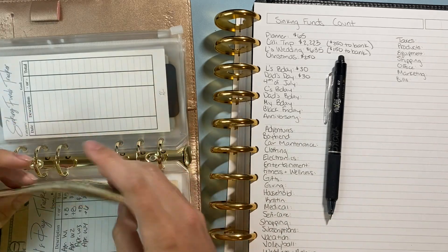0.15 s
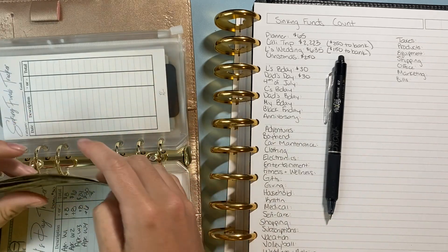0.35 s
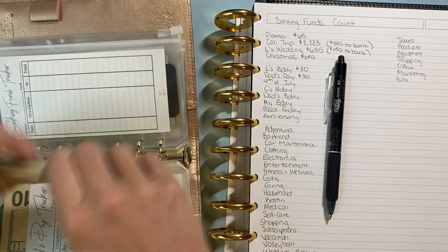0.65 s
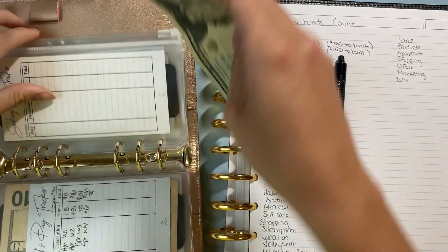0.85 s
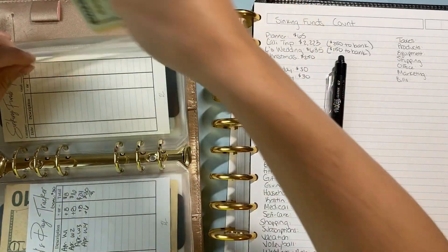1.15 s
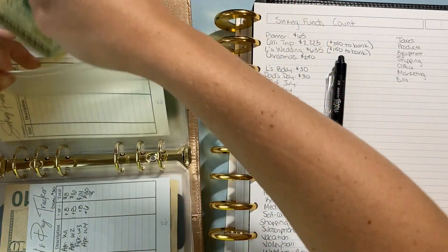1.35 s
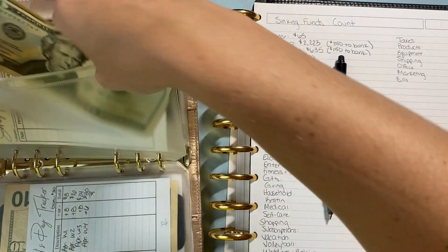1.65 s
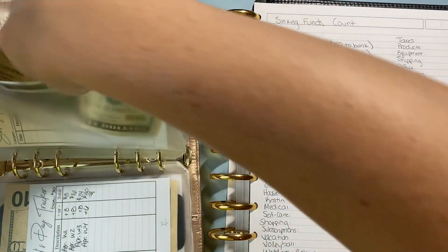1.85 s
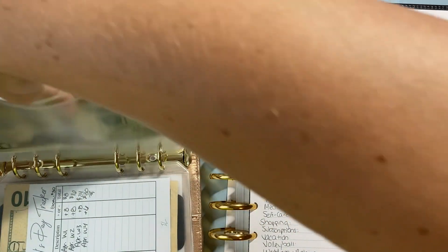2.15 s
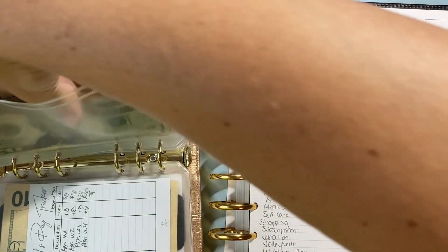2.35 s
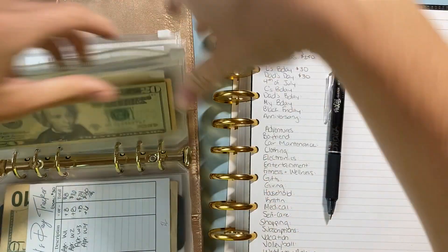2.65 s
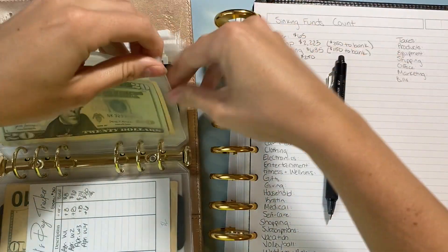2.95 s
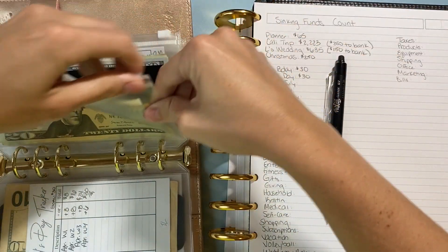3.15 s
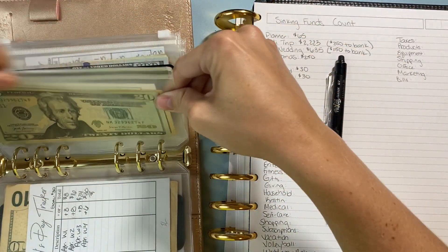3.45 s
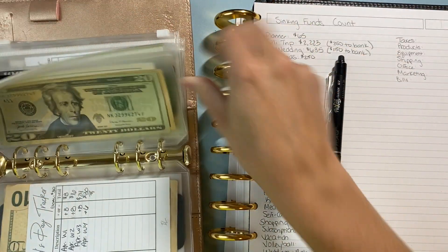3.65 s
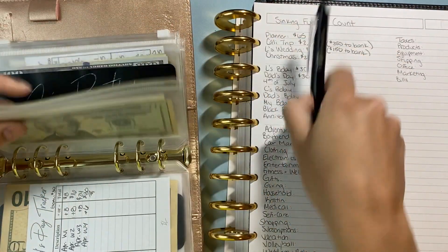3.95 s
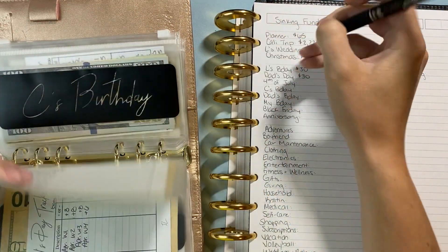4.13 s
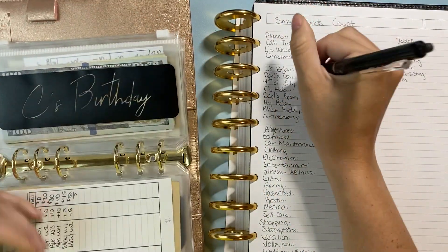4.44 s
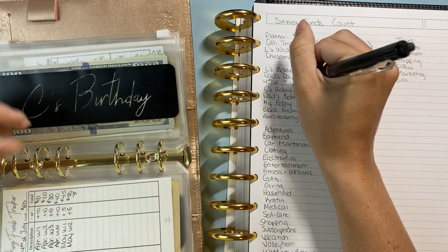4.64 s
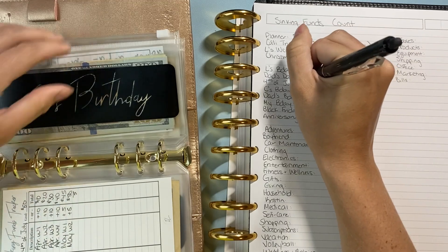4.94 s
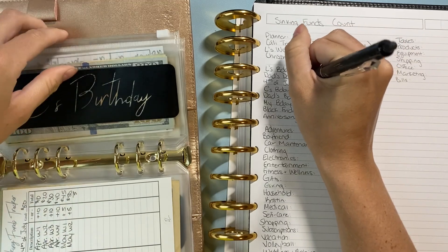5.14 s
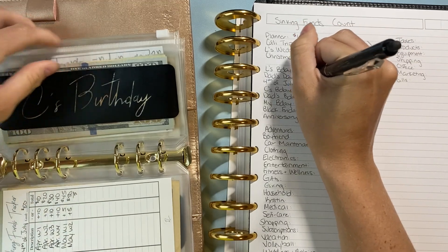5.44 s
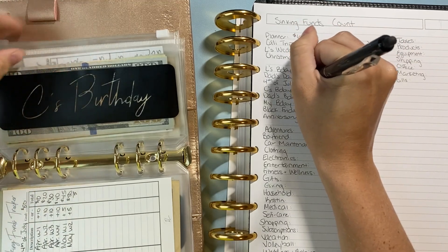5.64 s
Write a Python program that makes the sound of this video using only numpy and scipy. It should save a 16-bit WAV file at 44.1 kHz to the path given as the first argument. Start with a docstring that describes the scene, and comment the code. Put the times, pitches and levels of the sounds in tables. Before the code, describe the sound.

A low, slightly wavering ventilation rumble with very faint hiss runs throughout a small room; the microphones are close, in stereo. At 0.0 s bright, strong vinyl snaps and a rustle burst out, then softer brushing and duller flicks around 0.4-0.7 s as banknotes are pulled free. From 0.85 to 1.4 s there are light slides and thin, gliding rubs. Between 1.45 and 2.5 s rustling is densest as notes are pushed into the next envelope, with crackles, soft low binder bumps and a loud crack at 1.92 s. Quick strokes and small snaps follow at 2.8-3.1 s, a smooth slider rub until 3.35 s, then flicks at 3.45-3.7 s as the envelope turns. From 3.85 to 4.4 s plastic pen clicks mix with hollow notepad knocks; a strong page snap lands at 4.4 s, with a small rustle at 4.55 s. Afterwards only faint ticks remain, plus one soft flick at 5.5 s.

```python
"""Over steady ventilation rumble, banknotes are pulled from one vinyl envelope of a ring binder,
pushed into the next, and its slider is drawn shut; it is turned over, a pen is taken up with hollow
knocks on a notepad, a page is turned and fingers settle. Strokes are shaped noise and crinkles, snaps
and knocks are bursts rung by panels, rubs are gliding noise bands, the pen clicks through its barrel,
and bumps ring the binder's decaying modes. A small room answers the hands."""
import sys
import numpy as np
from scipy import signal
from scipy.fft import rfft, irfft, next_fast_len
from scipy.io import wavfile
from scipy.ndimage import uniform_filter1d, map_coordinates

SR = 44100
rng = np.random.default_rng(int(sys.argv[2]) if len(sys.argv) > 2 else 0)


def transcribe(u):
    """Save the signal u as a 16-bit wav file named by the first command-line argument.

    u: samples, shape (n,) or (channels, n), limited to [-1, 1]; the rate is SR.
    q: integer samples, one column per channel.
    """
    v = np.clip(np.atleast_2d(u).T, -1, 1)
    q = np.round(v * 32767).astype(np.int16)
    wavfile.write(sys.argv[1], SR, q)


N = 255339
TOP_HZ = 15950  # band limit


def amp(db):
    """Decibels to gain."""
    return 10 ** (np.asarray(db) / 20)


def unit(x):
    """x at rms 1."""
    return x / np.sqrt(np.mean(x ** 2) + 1e-20)


def along(points, hz):
    """(frequency, value) points interpolated on a log frequency axis."""
    f, v = np.transpose(points)
    return np.interp(np.log(hz + 1), np.log(f + 1), v)


def filtered(x, response):
    """x times a response of frequency."""
    size = next_fast_len(x.shape[-1] + SR // 4)
    spectrum = rfft(x, size) * response(np.fft.rfftfreq(size, 1 / SR))
    return irfft(spectrum, size)[..., :x.shape[-1]]


def add(track, time_s, sound):
    """Mix a sound into a track from time_s on."""
    start = max(0, round(time_s * SR))
    part = track[..., start:start + sound.shape[-1]]
    part += sound[..., :part.shape[-1]]


def wobble(rate_hz):
    """A smooth random curve of rms 1, rate_hz knots a second."""
    knots = rng.standard_normal(int(N * rate_hz / SR) + 4)
    return unit(map_coordinates(knots, [np.arange(N) * rate_hz / SR], order=2))


# left-right likeness at the microphones: (frequency [Hz], likeness [0-1])
LIKENESS = [(60, 1), (150, 0.93), (400, 0.59), (1300, 0.54), (3000, 0.54), (4500, 0.51), (5600, 0.055),
            (6800, 0.98), (15000, 0.84)]


def ports(pair):
    """Two unrelated signals become left and right, as alike as each frequency is at the microphones."""
    most_alike = .9  # above SR / 20

    def mid_side_gains(hz):
        limit = np.where(hz > SR / 20, most_alike, 1)
        turn = np.arccos(np.clip(along(LIKENESS, hz), 0, limit)) / 2
        return np.array([np.cos(turn), np.sin(turn)])

    mid, side = filtered(pair, mid_side_gains)
    return np.array([mid + side, mid - side])


def coloured(pair, spectrum):
    """A stereo signal of rms 1 with the given spectrum."""
    return unit(ports(filtered(pair, lambda hz: amp(along(spectrum, hz)))))


# ventilation spectrum: (frequency [Hz], level [dB])
AIR_SPECTRUM = [(15, -40), (30, -16.5), (40, -7), (54, 3), (70, 0.5), (95, -3.5), (120, 0.5), (150, -15.5),
                (200, -22.5), (280, -20), (450, -30), (1200, -47.5), (4000, -57.5), (11000, -54.5),
                (16000, -61)]


def ventilation():
    """Shaped noise: a low rumble that wavers a little, with faint hiss."""
    air = coloured(rng.standard_normal((2, N)), AIR_SPECTRUM)
    rumble = filtered(air, lambda hz: 1 / (1 + (hz / 170) ** 4))
    waver = amp(1.6 * wobble(8.7))
    return amp(-44) * (air + rumble * (waver - 1))


# hand slides paper or vinyl:
# (start [s], rise [s], fall [s], rustle [dB], hiss over rustle [dB], body over rustle [dB])
STROKES = [ (.012, 0.0063, 0.057, -37, 1.5, -11), (.265, 0.032, 0.011, -52.5, 2.5, -14),
           (.41, 0.029, 0.034, -44, -2.5, -6.5), (.465, 0.021, 0.14, -46, 0, -1),
           (.55, 0.059, 0.044, -46, -9, -8), (.61, 0.042, 0.086, -49.5, 3.5, -1),
           (.867, .012, 0.02, -53, 2.5, 0), (.945, 0.039, 0.048, -50, 3.5, -27),
           (1.208, 0.048, 0.067, -54, 7.5, -14), (1.44, 0.011, 0.021, -43.5, -9, -4.5),
           (1.55, 0.053, 0.026, -43.5, 2, -21), (1.615, 0.043, 0.053, -37, -3.5, -7.5),
           (1.755, .045, .05, -39.5, -0.5, -10), (1.878, 0.022, 0.092, -36, -4, -15),
           (1.94, 0.038, 0.068, -40.5, -6, -2.5), (1.999, 0.12, 0.045, -39, 3, -30),
           (2.18, 0.027, .025, -45, -3.5, 6), (2.24, 0.019, 0.097, -41.5, -6.5, -4.5),
           (2.365, 0.023, 0.2, -50.5, -5.5, -9), (2.46, 0.027, 0.043, -39, -2.5, 0.5),
           (2.61, 0.081, 0.026, -51, -1, -31), (2.778, 0.023, 0.044, -44.5, -9.5, -1.5),
           (2.862, 0.02, 0.033, -37.5, -7, -13), (2.90, 0.049, 0.047, -51.5, -2.5, 4),
           (3.07, 0.011, 0.026, -58.5, 2.5, 1), (3.191, 0.098, 0.05, -47, 1.5, -14),
           (3.37, 0.088, 0.18, -50.5, 0, -6.5), (3.555, .017, 0.011, -37.5, 1.5, -2),
           (3.684, 0.034, .04, -45, 1.5, -6), (3.825, 0.046, 0.081, -48.5, 9.5, 0.5),
           (4.01, 0.027, 0.028, -48, 5, -15), (4.06, 0.12, 0.064, -46.5, 4.5, 0.5),
           (4.285, 0.08, 0.048, -47.5, 4, -5), (4.39, 0.015, 0.056, -46.5, 3, -2),
           (4.533, 0.023, 0.035, -54, 8.5, -2), (5.474, .023, 0.042, -50, -4.5, 0.5)]
# light contact between strokes, firmest while the notes go in: (time [s], rustle level [dB])
LIGHT_CONTACT = [(0, -59.5), (.7, -66.5), (.84, -74), (.95, -64.5), (1.15, -70.5), (1.35, -64),
                 (1.6, -49.5), (2.15, -54), (2.6, -63), (2.74, -68), (2.9, -63), (3.02, -66), (3.16, -59.5),
                 (3.65, -66), (4.45, -63), (4.68, -79.5), (5.79, -75)]


def effort():
    """Gains of rustle, hiss and body: each stroke swells and dies away on top of the light contact."""
    contact_hiss_db, contact_body_db = 0, -3  # over its rustle
    edge_drop_db, roundness = 14.5, 1.32  # drop from peak after one rise or fall; power of the slope
    t = np.arange(N) / SR
    contact_offsets_db = np.array([[0], [contact_hiss_db], [contact_body_db]])
    power = amp(np.interp(t, *np.transpose(LIGHT_CONTACT)) + contact_offsets_db) ** 2
    for start_s, rise_s, fall_s, rustle_db, hiss_db, body_db in STROKES:
        from_peak_s = np.arange(-2 * rise_s, 2 * fall_s, 1 / SR)
        swell_db = -edge_drop_db * np.maximum(-from_peak_s / rise_s, from_peak_s / fall_s) ** roundness
        stroke_db = rustle_db + swell_db + np.array([[0], [hiss_db], [body_db]])
        add(power, start_s - rise_s, amp(stroke_db) ** 2)
    return np.sqrt(power)


def friction(catch_db, crinkle_db, patchy_db):
    """Rubbing noise: fibres catch quickly, creases pass more slowly, the bending sheet shifts the colour."""
    catch = catch_db * np.clip(wobble(420), -2, 2)
    crease = crinkle_db * np.clip(wobble(90), -2, 2)
    z = signal.stft(amp(catch + crease) * rng.standard_normal((2, N)), nperseg=512)[2]
    field = uniform_filter1d(rng.standard_normal(z.shape[1:]), size=6, axis=0)
    field = uniform_filter1d(field, size=7, axis=1)
    return signal.istft(z * amp(patchy_db * unit(field)), nperseg=512)[1][:, :N]


def crinkles(per_s, spread_db, centre_hz, cycles):
    """Tiny creases give way at random, each with a ring of a few cycles; rms 1."""
    out, t = np.zeros((2, N)), np.arange(256) / SR
    times_s = np.flatnonzero(rng.random(N) < per_s / SR) / SR
    draws = np.clip(rng.standard_normal((len(times_s), 3)), -1.7, 1.7)
    for time_s, (size, pitch, place) in zip(times_s, draws):
        turns = t * min(centre_hz * np.exp(.55 * pitch), TOP_HZ)
        ring = np.sin(2 * np.pi * turns) * np.exp(-turns / cycles)
        level_db = spread_db * size + np.array([[1.5], [-1.5]]) * place
        add(out, time_s, amp(level_db) * ring / np.linalg.norm(ring))
    return unit(out)


# binder body spectrum: (frequency [Hz], level [dB])
BODY_SPECTRUM = [(100, -4.5), (200, -1), (320, -3), (420, -1.5), (560, 3.5), (700, -5.5), (1000, -22.5),
                 (2000, -78.5)]
# crinkling sheet spectrum: (frequency [Hz], level [dB])
RUSTLE_SPECTRUM = [(350, -17.5), (650, -19.5), (850, -1), (1100, 2.5), (1400, 3), (2100, 1), (2900, -3),
                   (4000, -11), (8000, -92.5)]
# smooth surface spectrum: (frequency [Hz], level [dB])
HISS_SPECTRUM = [(1500, -26.5), (3000, -0.5), (4500, 1.5), (5700, 0), (7800, -0.5), (11000, -2),
                 (15000, -5.5), (16500, -8.5)]


def sliding():
    """Friction heard through the binder's body, the crinkling sheets and a smoother surface hiss."""
    rustle, hiss, body = effort()
    sheets = friction(catch_db=2.5, crinkle_db=3.0, patchy_db=1.0)
    surface = friction(catch_db=1.1, crinkle_db=1.74, patchy_db=3.5)
    paper = amp(-1.0) * coloured(sheets, RUSTLE_SPECTRUM)
    paper += amp(-7.0) * crinkles(per_s=280, spread_db=5.0, centre_hz=2100, cycles=1.4)
    fibres = amp(-.8) * coloured(surface, HISS_SPECTRUM)
    fibres += amp(-9) * crinkles(per_s=420, spread_db=5.0, centre_hz=5200, cycles=1.2)
    return body * coloured(sheets, BODY_SPECTRUM) + rustle * paper + hiss * fibres


def crack(length_s, gain, size=2048):
    """A short noise burst of unit energy, rung causally through a gain of frequency."""
    u = np.arange(size) / SR / max(length_s, 1e-4) * 2
    burst = rfft(rng.standard_normal((2, size)) * u * np.exp(-u))
    burst = burst / np.sqrt(np.abs(burst) + 1e-9)  # evens the spectrum
    burst = burst / np.sqrt(np.mean(np.abs(burst) ** 2, axis=1, keepdims=True))
    # folded cepstrum: minimum phase
    cepstrum = irfft(np.log(gain(np.fft.rfftfreq(size, 1 / SR) + 1) + 1e-6))
    fold = 1 + np.sign(np.fft.fftfreq(size))
    return irfft(burst * np.exp(rfft(cepstrum * fold)))


def panel_crack(ring_hz, ring_db, tilt_db, length_s, sharpness=3.54, low_cut_hz=420, high_cut_hz=15000):
    """A broad crack with the resonance of the panel that moves."""
    def gain(hz):
        resonance = amp(ring_db) / np.hypot(1, sharpness * (hz / ring_hz - ring_hz / hz))
        tilt = amp(tilt_db * np.log2((hz + 100) / 3100))  # dB per octave
        band_edges = np.hypot(1, (low_cut_hz / hz) ** 2 + (hz / high_cut_hz) ** 4)
        return np.hypot(1, resonance) * tilt / band_edges

    return crack(length_s, gain)


# a sheet buckles or an edge flicks free:
# (time [s], relative level [dB], panel resonance [Hz], brightness [dB/octave], length [s])
SNAPS = [ (0.0152, 4, 1310, -.2, .0018), (0.0292, -4.5, 8850, -2.7, 0.00043),
         (0.0435, 3, 4260, -2.5, 0.00073), (0.154, -20.5, 653, -2, 0.0021), (0.443, -11.5, 830, -2, 0.0022),
         (0.471, -5.5, 630, 2, .0035), (0.475, -6.5, 9070, -1, 0.0026), (0.4865, -9.5, 910, -2, 0.0022),
         (0.511, -10, 2650, -3.5, 0.0045), (0.8684, -32, 2980, 0.5, 0.0015),
         (1.0733, -24, 5000, 0, 0.00073), (1.254, -18, 2900, 0.5, .0009), (1.485, -21.5, 2450, 1, 0.001),
         (1.5204, -20, 3730, -2, 0.0028), (1.595, -15, 1280, -2, 0.0012), (1.67, -11, 1936, -2, 0.00092),
         (1.747, -16, 2970, -5, 0.00059), (1.7625, -2.5, 2530, 0, 0.0018), (1.784, -11, 3000, -1.5, .0023),
         (1.9213, 5.5, 1380, 0.3, 0.0015), (2.1194, -8.5, 1440, -6.5, 0.0019),
         (2.4126, -26, 750, -8, 0.0015), (2.492, -15.5, 1550, -6, 0.0011),
         (2.5097, -11.5, 1450, -3, 0.0011), (2.7947, -11, 2500, -5.5, .0014), (2.86, -21, 2840, -5, .0016),
         (2.879, -14, 1550, -3.5, .005), (2.9673, -19.5, 2780, -1, 0.0035), (3.036, -26.5, 2600, 2, 0.0015),
         (3.084, -17.5, 2620, -1, 0.0038), (3.152, -27, 760, -4, .0015), (3.4473, -6, 2800, -1.5, .0005),
         (3.56, -10, 1950, -1, 0.0019), (3.5724, -8.5, 4330, -6, 0.0019), (3.6285, -27, 2620, 1, 0.0012),
         (3.692, -19, 2170, -3.5, 0.00028), (4.4, 2.5, 864, 0, .0015), (4.537, -15.5, 600, -2, 0.003),
         (4.546, -23.5, 1280, 5, 0.0028), (4.822, -37.5, 3070, 3.7, .001), (5.0282, -31, 2100, -.5, 0.0023),
         (5.107, -34, 3610, -3.5, 0.0014), (5.137, -36, 3680, -7.5, 0.0046),
         (5.257, -40.5, 4020, 2.5, .0014), (5.3006, -37, 7600, -3, 0.0022), (5.374, -36.5, 3970, 0, .003),
         (5.49, -11, 2070, -1.5, 0.0033)]


def snaps():
    """Each buckle rings the stretch of sheet that jumps; the duller the crack, the more the ring stands out."""
    even_ring_db, most_ring_db = 9.5, 13  # at even brightness; at most
    ring_per_tilt = 1.7  # dB more per dB/octave of dullness
    out = np.zeros((2, N))
    for time_s, level_db, ring_hz, tilt_db, length_s in SNAPS:
        ring_db = min(even_ring_db - ring_per_tilt * tilt_db, most_ring_db)
        add(out, time_s, amp(level_db + 0.46) * panel_crack(ring_hz, ring_db, tilt_db, length_s))
    return ports(out)


# hands and notes bump the binder: (time [s], relative level [dB])
BUMPS = [(.50, -43), (1.251, -44), (1.53, -41), (1.666, -36.5), (1.933, -40), (2.508, -37.5), (3.57, -46),
         (3.862, -39), (3.885, -42)]
# binder's low modes, before random spread: (frequency [Hz], level [dB], T60 [s])
BINDER_MODES = [(136, -4, 0.22), (183.3, 0.5, .13), (242, -8, 0.055), (282.8, 1, 0.12), (333, 0, 0.038)]


def bumps(attack_s=0.0043):
    """A soft contact rings the binder's low modes, each time at new strengths and slightly new pitches."""
    out, t = np.zeros((2, N)), np.arange(SR // 3) / SR
    for time_s, bump_db in BUMPS:
        ring = np.zeros(len(t))
        for mode_hz, mode_db, t60_s in BINDER_MODES:
            decay = amp(mode_db + rng.normal(0, 2.2) - 60 * t / t60_s)
            turns = mode_hz * rng.normal(1, 0.033) * t + rng.random()
            ring += decay * np.sin(2 * np.pi * turns)
        add(out, time_s, amp(bump_db + 0.5) * (1 - np.exp(-t / attack_s)) * ring)
    return out


# a rubbed sheet sings in one resonance:
# (start [s], end [s], start frequency [Hz], end frequency [Hz], width [Hz], level [dB])
RUBS = [(1.103, 1.198, 5600, 5000, 800, -59), (1.187, 1.25, 4730, 4760, 150, -48.5),
        (1.268, 1.45, 2860, 2170, 610, -56.5), (1.632, 1.689, 2148, 1970, 400, -39),
        (2.189, 2.227, 4640, 4800, 500, -48), (2.634, 2.715, 1464, 1520, 600, -54),
        (3.122, 3.327, 2535, 2390, 800, -55), (3.569, 3.597, 938, 900, 250, -42),
        (3.813, 3.878, 1893, 2244, 1000, -45), (4.076, 4.185, 893, 793, 600, -47),
        (4.534, 4.593, 1276, 1327, 197, -51.5), (4.535, 4.589, 4790, 4810, 298, -47),
        (5.364, 5.393, 3850, 3990, 400, -62), (5.685, 5.723, 3950, 3820, 400, -65.5)]


def rubs():
    """Under a steady stroke a sheet rings in a narrow band that glides as its free length changes."""
    out = np.zeros((2, N))
    for start_s, end_s, from_hz, to_hz, width_hz, level_db in RUBS:
        size = max(round((end_s - start_s) * SR), 64)
        drift = rng.standard_normal((2, size)) + 1j * rng.standard_normal((2, size))
        drift = signal.sosfilt(signal.butter(2, width_hz / 2, fs=SR, output="sos"), drift)
        turns = np.cumsum(np.linspace(from_hz, to_hz, size)) / SR
        tone = np.real(drift * np.exp(2j * np.pi * turns))
        swell = np.sin(np.linspace(0, np.pi, size))
        add(out, start_s, amp(level_db) * unit(tone) * swell)
    return ports(out)


# fingers take up and turn the pen: (time [s], relative level [dB])
PEN_CLICKS = [(3.8704, -15), (3.881, -20.5), (3.911, -15), (4.035, -29), (4.07, -23.5), (4.0858, -17.5),
              (4.0969, -14.5), (4.107, -23.5), (4.1372, -11.5), (4.161, -21.5), (4.198, -22), (4.239, -22),
              (4.289, -23), (4.2925, -14), (4.319, -15), (4.345, -22), (4.375, -20.5)]
# barrel resonances: (frequency [Hz], width [Hz], level [dB])
BARREL = [(1760, 410, -11), (3900, 150, 0.5), (4600, 180, 5), (7400, 2300, -3), (10620, 640, -1),
          (14400, 1900, -5.5)]


def pen():
    """Loose plastic parts click inside the barrel, through its resonances."""
    def barrel_gain(hz):
        power = sum(amp(db) ** 2 / (1 + ((hz - c * c / hz) / width) ** 2) for c, width, db in BARREL)
        return np.sqrt(power)

    out = np.zeros((2, N))
    for time_s, level_db in PEN_CLICKS:
        add(out, time_s, amp(level_db + 16.5) * crack(.003, barrel_gain))
    return ports(out)


# hollow knocks on the notepad as the pen is lifted: (time [s], relative level [dB], resonance [Hz])
KNOCKS = [(4.099, -21, 930), (4.135, -21.5, 950), (4.1466, -15, 880), (4.186, -15, 710),
          (4.2068, -14.5, 750), (4.226, -25, 764)]


def knocks():
    """The notepad answers each knock with a dull, hollow ring."""
    out = np.zeros((2, N))
    for time_s, level_db, ring_hz in KNOCKS:
        knock = panel_crack(ring_hz, ring_db=22.5, tilt_db=-4, length_s=.003, sharpness=5.5)
        add(out, time_s, amp(level_db + 1.5) * knock)
    return ports(out)


# room decay: (frequency [Hz], T60 [s])
ROOM_T60 = [(200, .3), (1000, .33), (4000, 0.29), (14000, 0.17)]


def room(x, table_db, table_decay_s, tail_db, size=8192):
    """The table top scatters the sound at once, the walls follow; both answers change as the hands move."""
    out = np.zeros((2, N))
    t = np.arange(2 * size) / SR
    padded = np.pad(x, ((0, 0), (size, 2 * size)))
    for start in range(0, N + size, size):  # new answers for each overlapping piece
        hz, frames_s, z = signal.stft(rng.standard_normal((2, len(t))), SR, nperseg=256)
        decay = amp(-60 * frames_s / along(ROOM_T60, hz)[:, None])
        tail = signal.istft(z * decay, SR, nperseg=256)[1] * (1 - np.exp(-t / 0.0011))
        table = rng.standard_normal(tail.shape) * (t > .001) * np.exp(-t / table_decay_s)
        walls = amp(tail_db) * tail / np.linalg.norm(tail[0])
        answer = ports(walls + amp(table_db) * table / np.linalg.norm(table[0]))
        piece = padded[:, start:start + 2 * size].mean(axis=0) * np.hanning(2 * size)
        echo = signal.fftconvolve(piece[None], answer, axes=1)
        add(out, (start - size) / SR, echo[:, max(0, size - start):])
    return out


# stereo balance of the handling: (frequency [Hz], left minus right [dB])
BALANCE = [(300, -1), (750, -3), (1300, -1), (2400, 2), (4400, 3), (8000, -0.5)]


def scene():
    """All the handling in the room, over the rumble."""
    hands = sliding() + snaps() + bumps() + rubs() + pen() + knocks()
    hands = hands + room(hands, table_db=-7.0, table_decay_s=0.0044, tail_db=-12.5)
    balanced = filtered(hands, lambda hz: amp(np.outer([.5, -.5], along(BALANCE, hz))))
    return balanced + ventilation()


def record(dry):
    """High treble reaches the left channel a little late, high peaks are rounded, the band is limited."""
    lag_s, from_hz, ceiling = .000233, 6900, .8

    def left_lag(hz):
        return np.exp(-2j * np.pi * np.outer([lag_s, 0], np.maximum(hz - from_hz, 0)))

    late = filtered(dry, left_lag)
    rounded = late / (1 + np.abs(late / ceiling) ** 6) ** (1 / 6)
    return filtered(rounded, lambda hz: hz < TOP_HZ)


dry = scene()
out = record(dry)
transcribe(out)
```